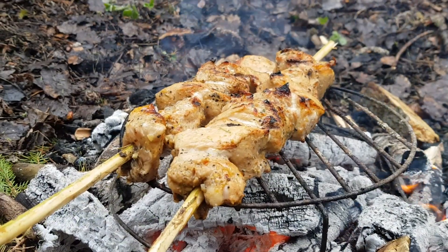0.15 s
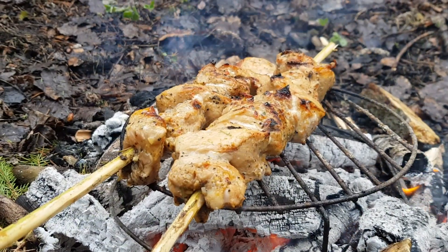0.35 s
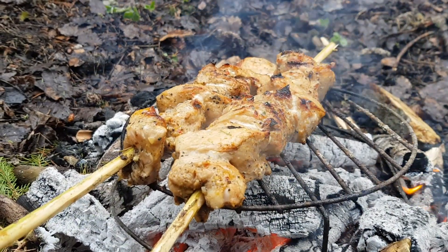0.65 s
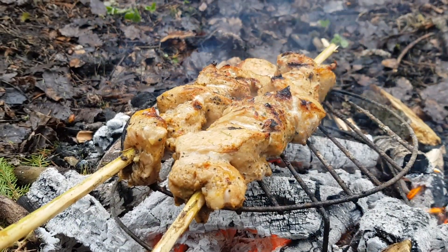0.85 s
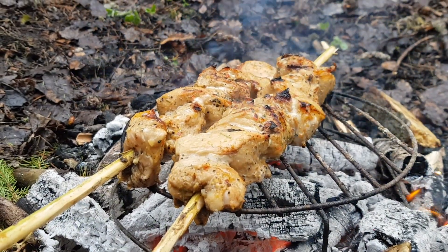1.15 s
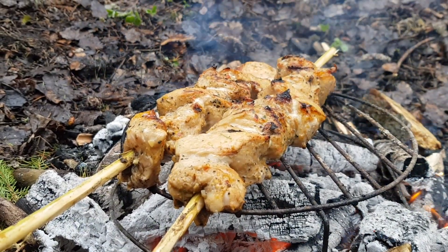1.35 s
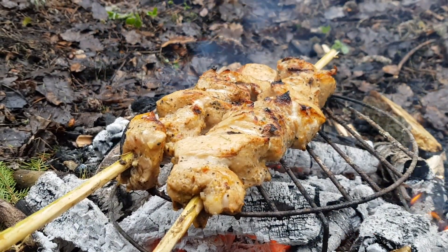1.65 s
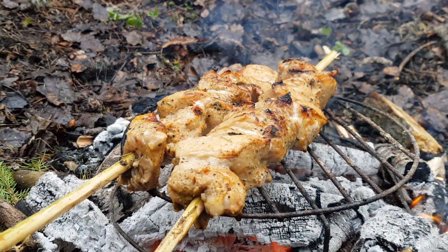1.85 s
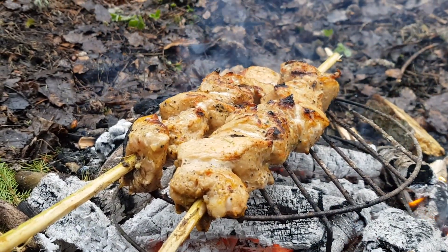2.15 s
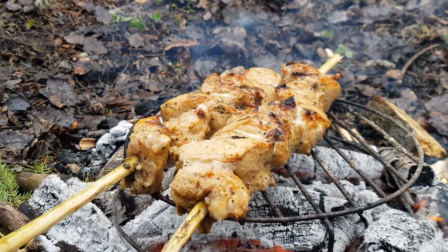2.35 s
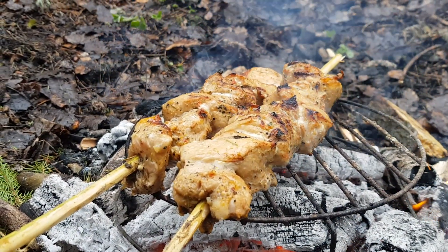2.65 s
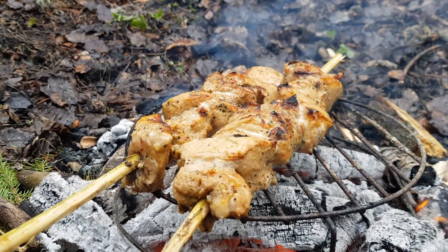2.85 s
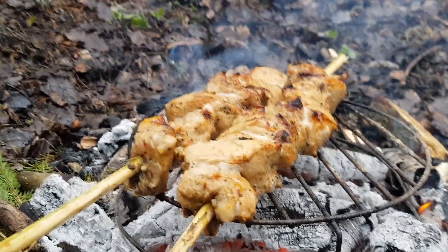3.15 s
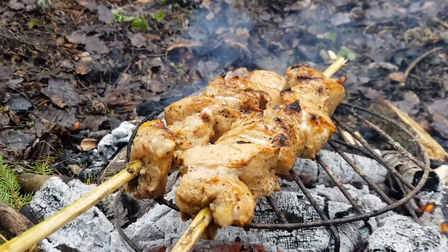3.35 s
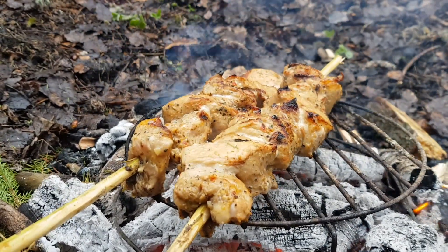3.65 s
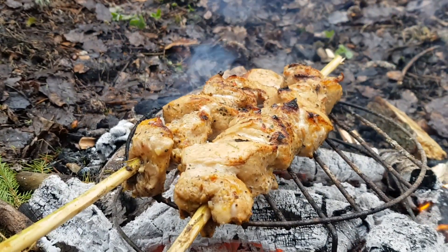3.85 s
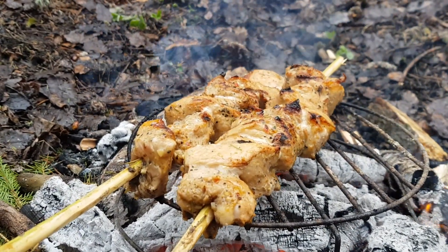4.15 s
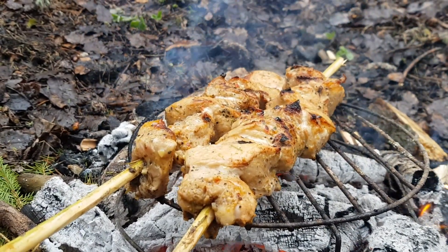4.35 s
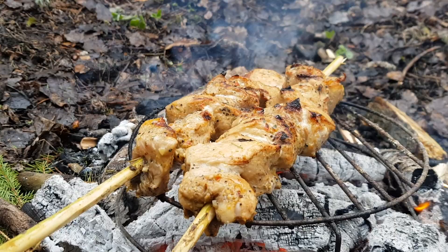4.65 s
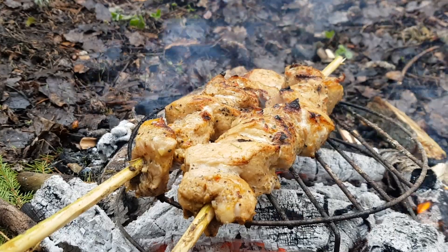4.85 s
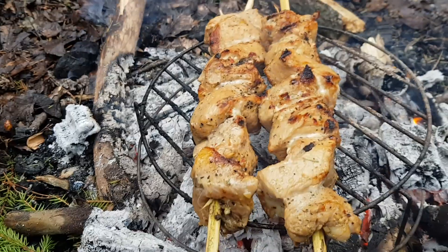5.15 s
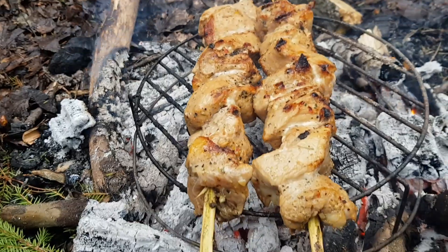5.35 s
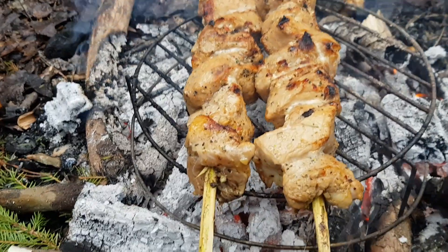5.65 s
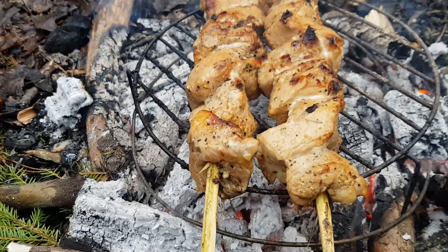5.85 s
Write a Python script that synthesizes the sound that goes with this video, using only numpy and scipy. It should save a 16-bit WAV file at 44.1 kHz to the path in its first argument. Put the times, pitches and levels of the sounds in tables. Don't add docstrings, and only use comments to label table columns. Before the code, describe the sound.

Handheld stereo phone near a small fire in the woods. Quiet breeze and deep draught flutter sit behind thin hissing steam and grainy sizzling fat. Dry clicks and sharp coal pops come irregularly, mostly in the second and third seconds. Around three seconds the case is scraped on the right side. It quietens, then sizzle returns with a gust, bumps and the loudest snaps.

```python
import sys
import numpy as np
from scipy import signal
from scipy.fft import rfft, irfft, next_fast_len
from scipy.io import wavfile
from scipy.ndimage import uniform_filter1d

SR = 44100
rng = np.random.default_rng(int(sys.argv[2]) if len(sys.argv) > 2 else 0)


def master_out(mix):
    frames = np.transpose(np.atleast_2d(mix))
    ceiling = np.clip(frames, -1, 1)
    pcm = np.round(ceiling * 32767).astype(np.int16)
    wavfile.write(sys.argv[1], SR, pcm)


def attenuation_scalar(level_db):
    decades = np.asarray(level_db, float) / 20
    return 10 ** decades


N = 265041


def on_log_axis(table, hz):
    table_hz, values = np.transpose(table)
    return np.interp(np.log(hz + 1), np.log(table_hz), values)


def curves(table):
    s, *columns = np.transpose(table)
    return [np.interp(np.arange(N) / SR, s, column) for column in columns]


def held(table, rise_s, fade_s):
    start, length, value = (column[:, None] for column in np.transpose(table))
    t = np.arange(N) / SR
    rise = (t - start) / rise_s + 1
    fade = (start + length - t) / fade_s + 1
    return value, np.minimum(rise, fade).clip(0, 1)


def walk(rate):
    hold = int(SR / rate)
    steps = np.repeat(rng.standard_normal(N // hold + 1), hold)
    return uniform_filter1d(steps, hold)[:N]


def band(x, lo_hz, hi_hz, order=2):
    return signal.sosfilt(signal.butter(order, [lo_hz, hi_hz], "bandpass", fs=SR, output="sos"), x)


def unit(x):
    return x / np.sqrt(np.mean(x.mean(axis=0) ** 2))


def panned(db, pan_db):
    gains = attenuation_scalar(np.array([pan_db, -pan_db]) / 2)
    return attenuation_scalar(db) * gains / gains.mean(axis=0)


def place(sounds, s):
    length = sounds.shape[-1]
    out = np.zeros((2, N + length))
    for k, i in enumerate((s * SR).astype(int)):
        out[:, i:i + length] += sounds[:, k]
    return out[:, :N]


def causal(table, size=512):
    gain_db = on_log_axis(table, np.fft.rfftfreq(size, 1 / SR))
    cepstrum = irfft(np.log(attenuation_scalar(gain_db)), size)
    cepstrum[1:size // 2] *= 2
    cepstrum[size // 2 + 1:] = 0
    return irfft(np.exp(rfft(cepstrum)), size)


# (frequency [Hz], gain [dB])
LEFT_PORT = [(1000, -3.5), (1750, -11), (2350, 2), (2700, -1), (3200, -8), (4900, -7), (6500, -3),
             (7300, -5), (8100, -13), (8800, -8), (10500, -2), (12000, -0.5), (16000, -5)]
RIGHT_PORT = [(1000, -2), (1800, 3), (2400, 9), (2700, 7.5), (3100, -2), (4300, -4.5), (5000, -5),
              (6500, -16), (7300, -21.5), (8100, -22.5), (9600, -19.5), (11500, -8), (16000, -6.5)]


def ports(x):
    responses = np.array([causal(LEFT_PORT), causal(RIGHT_PORT)])
    responses = responses.reshape((2,) + (1,) * (x.ndim - 2) + (-1,))
    return signal.fftconvolve(x, responses, axes=-1)[..., :x.shape[-1]]


def hiss():
    return attenuation_scalar(-71) * unit(ports(rng.standard_normal((2, N))))


# (frequency [Hz], density [dB per Hz])
AIR_COLOUR = [(30, -10.5), (60, 1), (120, -13.5), (250, -15), (330, -17), (420, -30), (900, -25.5),
              (1600, -31), (2500, -39)]
# (frequency [Hz], correlation [0-1])
AIR_LIKENESS = [(60, 0.87), (130, 0.99), (290, 0.62), (640, 0.33), (1400, 0.018)]
# (time [s], level [dB])
BREEZE = [
    (0, -63.5),
    (.6, -59.5),
    (1.0, -61),
    (1.44, -59),
    (2.5, -62),
    (3.5, -60.5),
    (4.2, -58.5),
    (4.55, -63),
    (5.0, -55.5),
    (6.01, -59),
]
# (start [s], length [s], lean to the right [dB])
RUBS = [(-.1, .8, 6), (.985, 0.0089, 14), (2.0, .8, 1), (2.88, 0.17, 26), (3.07, .09, 33), (3.2, .08, 24),
        (3.32, 0.22, 11.5), (3.84, .05, 2.5), (4.09, 0.026, 10), (4.75, 0.097, 2.5), (5.07, 0.045, 8),
        (5.45, .15, 2)]


def air():
    breeze_db = curves(BREEZE)[0]
    lean_db, shape = held(RUBS, rise_s=0.033, fade_s=0.07)
    rub_db = (lean_db * shape).max(axis=0)
    bass_db = breeze_db + 0.26 * rub_db
    rustle_db = -68 + 0.65 * (breeze_db + 59) + 0.22 * rub_db
    hz = np.fft.rfftfreq(N, 1 / SR)
    like = on_log_axis(AIR_LIKENESS, hz).clip(0, 1)
    spectra = rfft(rng.standard_normal((2, N))) * attenuation_scalar(on_log_axis(AIR_COLOUR, hz))
    mid, side = spectra * np.sqrt([1 + like, 1 - like])
    noise = irfft(np.array([mid + side, mid - side]), N)
    bass = unit(band(noise, 55, 352)) * panned(bass_db + 1.27 * walk(18), -0.32 * rub_db)
    grains_db = (rub_db / 4).clip(0, 5) * walk(250)
    rustle_gain = panned(rustle_db + 1.4 * walk(20) + grains_db, -0.5 * rub_db)
    return bass + unit(band(noise, 292, 2530)) * rustle_gain


# (time [s], pitch [Hz], level [dB], share that beats [0-1])
DRAUGHT = [(0, 43.3, -50.5, 0.9), (.45, 45, -52, 0.6), (1.3, 45.57, -50, 1), (1.66, 45.46, -56.5, 0.7),
           (1.9, 44.87, -54.5, 0.85), (2.24, 45, -50, 0.7), (2.55, 41.6, -54, 0.3), (2.74, 45.8, -42, 0.02),
           (2.86, 49.66, -58.5, 0.5), (3.05, 50.37, -43, 0.9), (3.7, 53.22, -46.5, 0.5),
           (4.0, 52.67, -50.5, 0.83), (4.4, 51.17, -43.5, 0.79), (4.9, 50.4, -50, 0.55),
           (5.3, 44.6, -49, 0.16), (5.62, 45.9, -39.5, .05), (5.72, 47.5, -54.5, 0.1),
           (6.01, 43.36, -56, 0.4)]


def flutter():
    hz, db, beating = curves(DRAUGHT)
    share = beating.clip(0, 1)
    throbs_per_s = 8.2 * attenuation_scalar(3.6 * walk(7.3))
    throb = 1 - share + share * np.abs(np.cos(np.pi * np.cumsum(throbs_per_s) / SR))
    phase = 2 * np.pi * np.cumsum(hz * (1 + 0.0824 * walk(25))) / SR
    stray = band(rng.standard_normal((2, N)), 26, 74.6)
    mid, side = stray / stray.std()
    swing = np.sqrt(2) * attenuation_scalar(1.8 * walk(17)) * throb * np.sin(phase) + 0.26 * mid
    return attenuation_scalar(db) * (swing + 0.14 * side * np.array([[1], [-1]]))


# (time [s], peak [dB], pitch [Hz], left minus right [dB])
BUMPS = [
    (3.138, -41, 80.7, -37),
    (5.029, -32, 106, -33),
    (5.099, -45, 134.6, -25),
    (5.664, -40.5, 79.6, 4),
]


def bumps():
    s, peak_db, hz, pan_db = np.transpose(BUMPS)
    turns = hz[:, None] * np.arange(2048) / SR
    swing = np.sin(2 * np.pi * turns) * turns * np.exp(-turns / 0.5) * 4
    return place(swing * panned(peak_db, pan_db)[..., None], s)


# (time [s], right peak [dB], pulse length [ms], grit re peak [dB])
SLIPS = [(2.8786, -41, 1, -16), (2.9094, -21.5, 0.8, -21), (2.9198, -37, 0.8, -15),
         (2.9695, -44.5, 1.7, -2), (3.0028, -35, 1.8, -5), (3.016, -40, 0.4, -13), (3.053, -44, 0.39, -7),
         (3.0832, -37.5, 1.1, 3), (3.085, -33, 0.43, -10), (3.0941, -33.5, 1, -4), (3.1033, -35.5, 1.6, 5),
         (3.1056, -25.5, 1.1, -0.5), (3.1178, -36, 1.4, -6), (3.1416, -39, 1.25, -6),
         (3.159, -45, 0.95, -14), (3.211, -60, 2.1, -16), (3.2502, -47, 5.1, -14), (3.2781, -49, 3.1, -23),
         (3.3128, -37, 5.4, -27), (3.325, -46.5, 4, -28), (3.3462, -47, 3.3, -20),
         (3.3716, -43.5, 4.8, -20), (4.8022, -47.5, 4, -25), (5.0337, -40, 4.7, -28),
         (5.0495, -46.5, 1.8, -19)]


def slips():
    s, right_db, ms, grit_db = np.transpose(SLIPS)
    left_db = -67 + 0.3 * (right_db + 31)
    t = np.arange(-256, 512) / SR
    turns = t / (ms.clip(0.2, 6)[:, None] / 1000) - 0.22
    jerk = 2 * np.sin(2 * np.pi * turns) * np.exp(-(turns / 0.24) ** 2)
    jerk = jerk + 0.32 * np.sin(2 * np.pi * 170 * t) * np.exp(-np.abs(t) / 0.0015)
    scrape = np.exp(-np.abs(t) / 0.00073) + 0.21 * np.exp(-np.abs(t) / 0.0058)
    grit = rng.standard_normal((len(s), len(t))) * scrape
    grit = ports(band(np.array([grit, grit]), 2500, 16400))[1]
    grit = attenuation_scalar(grit_db)[:, None] * grit / np.abs(grit).max(axis=1, keepdims=True)
    return place((jerk + grit) * attenuation_scalar([left_db, right_db])[..., None], s + t[0])


# (time [s], pitch [Hz], level [dB])
WHISTLE = [
    (.76, 4760, -100),
    (.84, 4600, -92),
    (1.0, 4516, -74.5),
    (1.2, 4380, -85),
    (1.3, 4310, -100),
]


def whistle():
    hz, db = curves(WHISTLE)
    breath = uniform_filter1d(rng.standard_normal((2, N)), size=150)
    return attenuation_scalar(db) * unit(breath * np.sin(2 * np.pi * np.cumsum(hz) / SR))


# (time [s], level [dB])
COOKING = [(0, -76), (.69, -77.5), (.84, -76.5), (1.0, -79.5), (1.27, -73), (1.62, -72.5), (1.81, -69.5),
           (2.13, -76), (2.4, -76.5), (3.2, -72.5), (3.5, -78), (3.63, -82), (4.2, -79.5), (4.72, -76.5),
           (5.0, -74.5), (5.15, -71.5), (5.42, -74.5), (5.9, -86.5)]
# (start [s], length [s], gain [dB])
FITS = [(1.395, 0.12, 3), (1.65, 0.1, 4.5), (1.82, 0.045, 2.5), (2.36, 0.014, 4), (2.48, 0.062, 5.5),
        (2.69, 0.016, 2.5), (2.8, 0.037, 5), (3.4, .09, 3), (5.12, 0.026, 1), (5.22, 0.44, 2.5),
        (5.86, .02, 10)]
# (start [s], length [s], level [dB])
JETS = [
    (-.1, 1.0, -71.5),
    (1.2, 0.72, -69),
    (2.0, 0.88, -75.5),
    (2.8, 0.42, -69.5),
    (3.46, 0.035, -79),
    (4.2, 0.14, -75),
    (5.1, .27, -75.5),
    (5.5, 0.57, -88),
]
# (low edge [Hz], high edge [Hz])
SIZZLE_HZ = [(1500, 3000), (3000, 4200), (4200, 7500), (7500, 17000)]


def sizzle():
    unrest = attenuation_scalar(1.74 * walk(40) + 0.5 * walk(220))
    droplets_db = (3 * rng.exponential(size=N)).clip(0, 17)
    droplets = attenuation_scalar(droplets_db) * (rng.random(N) < 0.025)
    tail = np.exp(-np.arange(128) / SR / 0.0004)
    swarm = np.sqrt(signal.fftconvolve(droplets ** 2, tail)[:N].clip(0) + 0.25)

    usual_db = -74.5
    fit_db, boiling = held(FITS, rise_s=0.0058, fade_s=0.023)
    fit_db = (fit_db * boiling).max(axis=0)
    cooking = curves(COOKING)[0] - usual_db + fit_db
    port_db = usual_db + 3.5 + 0.85 * cooking + 0.5 * fit_db
    middle_db = usual_db + 0.34 + cooking
    top_db = usual_db + 0.5 + 1.27 * cooking
    jet_db, shape = held(JETS, rise_s=0.054, fade_s=0.22)
    steam_db = 20 * np.log10((attenuation_scalar(jet_db) * shape).max(axis=0) + attenuation_scalar(-101))

    lively = ((top_db + 84) / 12).clip(0.15, 1)
    grain = unrest * swarm
    grain = (grain / np.sqrt(np.mean(grain ** 2))) ** lively
    spit = ports(grain * rng.standard_normal((2, N)))
    out = 0
    for db, edges_hz in zip([port_db, steam_db, middle_db, top_db], SIZZLE_HZ):
        out = out + attenuation_scalar(db + 1.12 * walk(9.8)) * unit(band(spit, *edges_hz, order=3))
    return out


# (time [s], peak [dB], thud re peak [dB], crack re peak [dB], fizz re peak [dB])
POPS = [(0.9915, -44, -17.5, -16, -25), (1.2376, -33.5, -10.5, -16, -51), (1.2442, -38.5, -4.5, -19, -18.5),
        (1.3053, -47.5, -15.5, -9.5, -13.5), (1.4869, -41.5, -31, -13, -19),
        (1.5808, -24.5, -26.5, -14.5, -47), (1.715, -43.5, -33, -21, -23),
        (1.914, -37.5, -25, -11.5, -16.5), (2.114, -44.5, -30, -18, -15), (2.365, -40.5, -32, -15.5, -31),
        (2.3707, -39, -32, -49, -28), (2.4365, -42.5, -28, -16, -22), (2.4891, -38.5, -33, -14, -20.5),
        (2.5167, -39, -34, -19, -32), (2.8217, -45, -26, -7.5, -36), (2.8874, -40.5, -23, -6.5, -11.5),
        (3.4822, -43.5, -25, -16.5, -19), (4.3248, -44.5, -13.5, -13, -20), (4.3954, -72.5, 6, 16, 21.5),
        (4.994, -38, -11.5, -16.5, -24), (5.2691, -18.5, -17, -17, -28.5), (5.3634, -47.5, -26, -13, -22),
        (5.6738, -58.5, 2.5, -6.5, -13), (5.8128, -14, -19, -20, -21.5)]
# (time [s], peak [dB], brightness re peak [dB])
SPITS = [(0.2112, -55, -2.5), (1.3724, -53.5, -8), (1.3955, -53, -8), (1.4632, -46, -15), (1.5251, -57, -2),
         (1.6128, -46, -21), (1.6568, -45.5, -14), (1.67, -60, 0), (1.703, -45, -12), (1.7083, -56.5, 1),
         (1.7267, -60, 3), (1.731, -60, 2), (1.8247, -49.5, -9), (1.8372, -53, -4), (1.8579, -70, -10),
         (2.0217, -50.5, -14), (2.086, -56.5, -4.5), (2.3734, -55, -7), (2.4524, -73, -8),
         (2.5083, -50, -11), (2.5324, -60, 9), (2.581, -49, -14), (2.6917, -58, -3), (2.7948, -54.5, -12),
         (2.811, -51, -10), (2.834, -55, -6.5), (3.429, -64.5, 2), (4.9361, -57.5, -7), (5.127, -50, -10),
         (5.866, -59, -3)]
# (time [s], peak [dB], thud re peak [dB], brightness re peak [dB])
TICKS = [(0.113, -58, -23, -11), (0.7373, -55, -21, -15), (1.4159, -56.5, -8.5, -26),
         (2.9376, -47, -23, -14), (3.4039, -57, -14, -21), (3.455, -44.5, -25, -10), (4.0939, -58, -3, -13),
         (4.122, -50.5, -13, -14), (4.8795, -58, -8.5, -24), (5.1058, -60.5, 0.5, -20),
         (5.8417, -47, -17, -6.5), (5.8735, -55.5, -11, -13)]


def bursts():
    rows = [(*row, -1.5) for row in POPS]
    rows += [(s, db, -26, bright, bright - 5.5, -1.5) for s, db, bright in SPITS]
    rows += [(s, db, thud, bright, bright - 5.5, -15) for s, db, thud, bright in TICKS]
    return np.transpose(rows)


# (low edge [Hz], high edge [Hz])
BURST_HZ = [(1300, 3100), (3600, 6800), (7300, 17000)]


def pops():
    s, peak_db, thud_db, crack_db, fizz_db, pan_db = bursts()
    t = np.arange(1024) / SR
    chance = rng.standard_normal((2, len(s), len(t)))
    echoes = chance * np.abs(chance) * (0.08 * np.exp(-t / 0.0015) + 0.012 * np.exp(-t / 0.005))
    click = t == 4 / SR
    cracks = [band(ports(echoes + direct * click), *edges_hz)
              for direct, edges_hz in zip([1, 0.45, 0.25], BURST_HZ)]
    rise = t / 0.00012
    swing = np.sin(2 * np.pi * 135 * t) * np.exp(-t / 0.0032)
    push = 2.22 * rise * np.exp(-rise) - 0.43 * swing + 4.2 * band(echoes, 700, 1470)
    levels_db = [peak_db + thud_db + 15.5, peak_db, peak_db + crack_db + 12.5, peak_db + fizz_db + 18]
    out = 0
    for part, db in zip([push] + cracks, levels_db):
        peak = np.abs(part.mean(axis=0)).max(axis=-1, keepdims=True)
        out = out + part / peak * attenuation_scalar(db)[:, None]
    return place(out * panned(0, pan_db + 2.5)[..., None], s + 0.00043)


def scene():
    background = hiss() + air() + flutter()
    hand = bumps() + slips()
    fire = whistle() + sizzle() + pops()
    return background + hand + fire


def low_pass(x):
    return signal.sosfilt(signal.butter(12, 17000, fs=SR, output="sos"), x)


def record(dry):
    x = signal.sosfilt(signal.butter(2, 30, "highpass", fs=SR, output="sos"), dry)
    size = next_fast_len(N)
    hz, spectrum = np.fft.rfftfreq(size, 1 / SR), rfft(x, size)
    steady_top_hz, sharp_top_hz = 15950, 16600
    below = ((steady_top_hz - hz) / 120 + 0.5).clip(0, 1)
    body = irfft(spectrum * below, size)[:, :N]
    top = irfft(spectrum * (1 - below) * (hz < sharp_top_hz), size)[:, :N]
    loud = uniform_filter1d(np.abs(top).max(axis=0), size=64) > attenuation_scalar(-59)
    gate = uniform_filter1d(uniform_filter1d(1.0 * loud, size=48), size=48)
    return low_pass(body + gate * top)


dry = scene()
out = record(dry)
master_out(out)
```